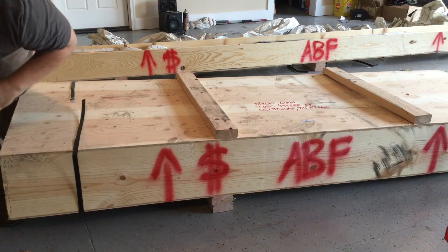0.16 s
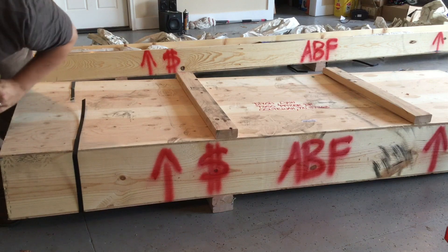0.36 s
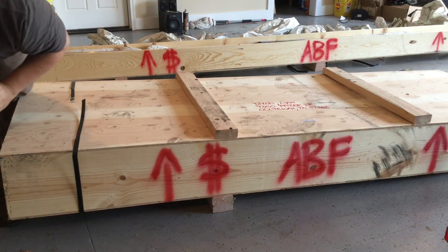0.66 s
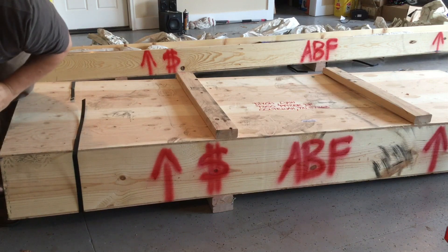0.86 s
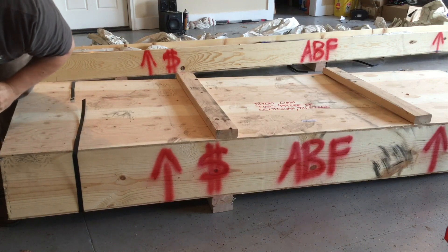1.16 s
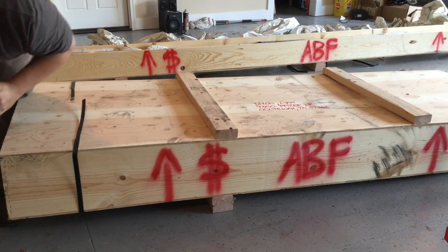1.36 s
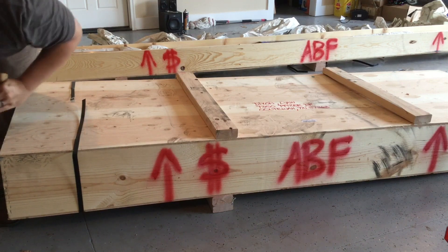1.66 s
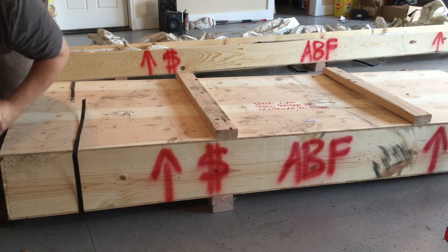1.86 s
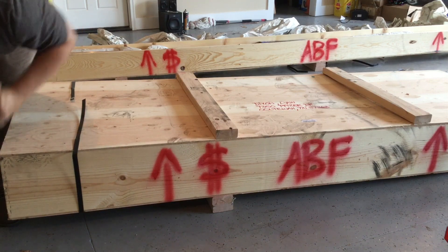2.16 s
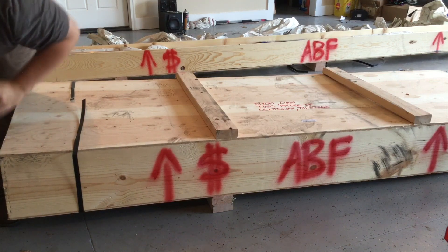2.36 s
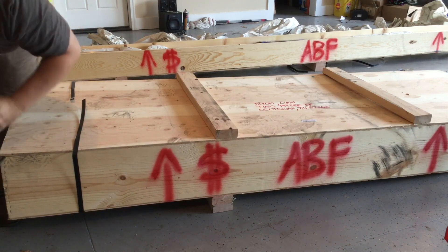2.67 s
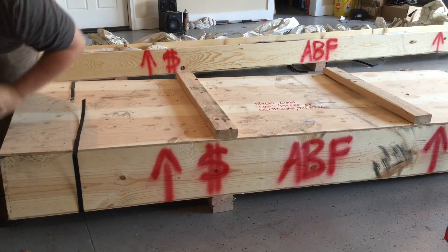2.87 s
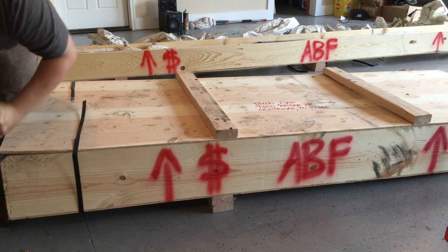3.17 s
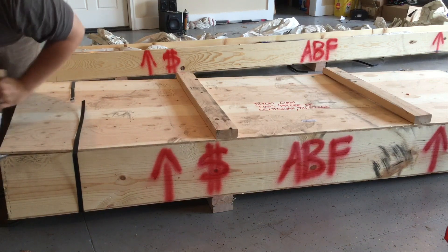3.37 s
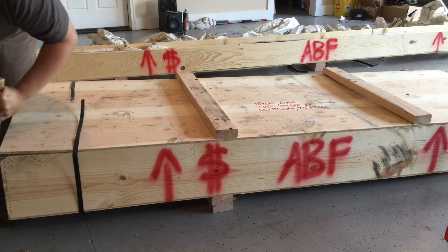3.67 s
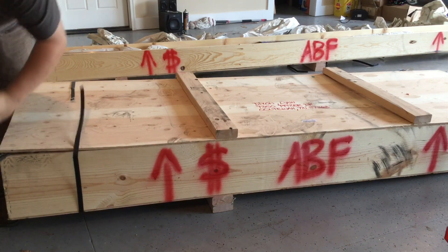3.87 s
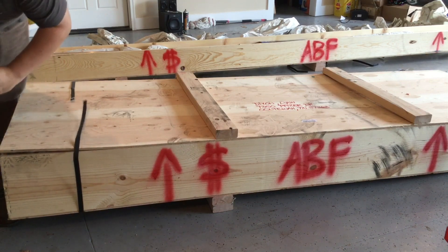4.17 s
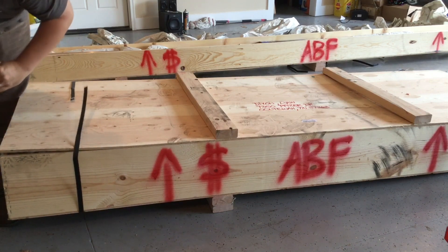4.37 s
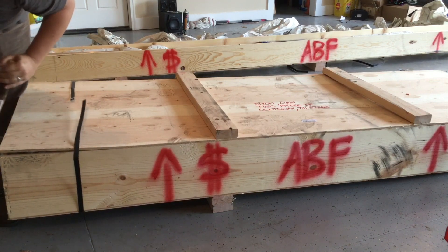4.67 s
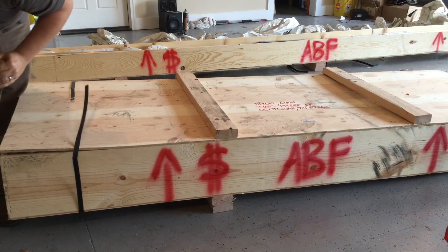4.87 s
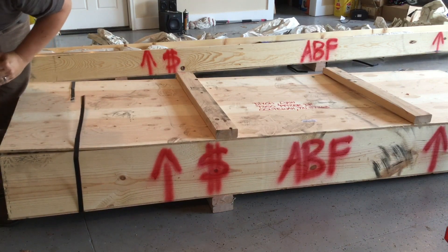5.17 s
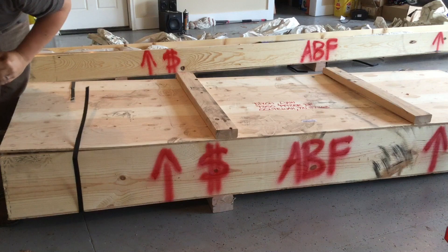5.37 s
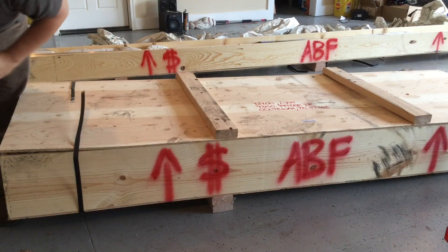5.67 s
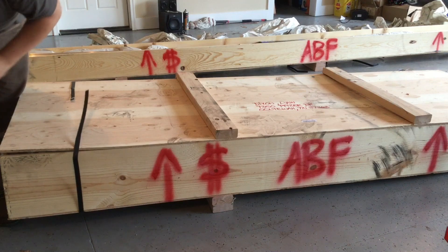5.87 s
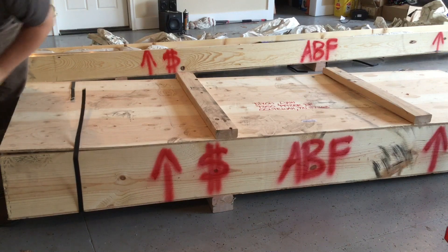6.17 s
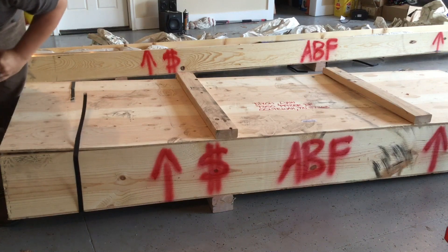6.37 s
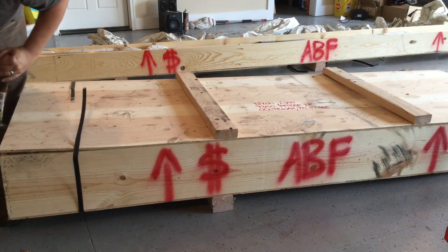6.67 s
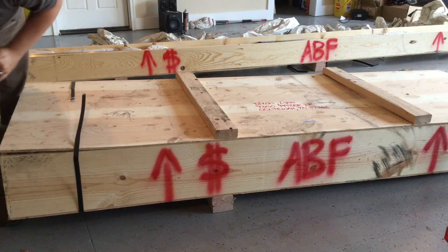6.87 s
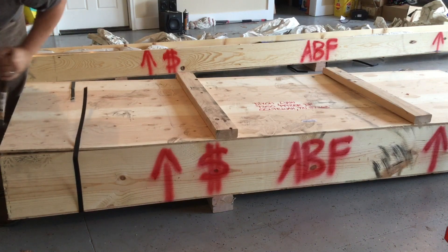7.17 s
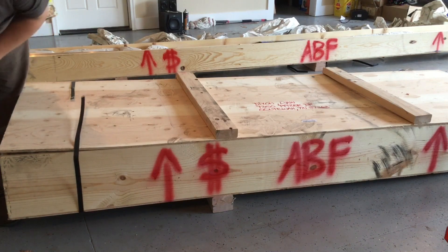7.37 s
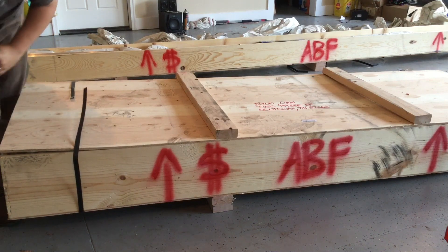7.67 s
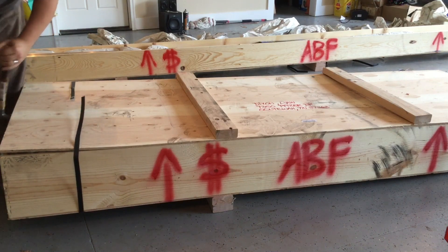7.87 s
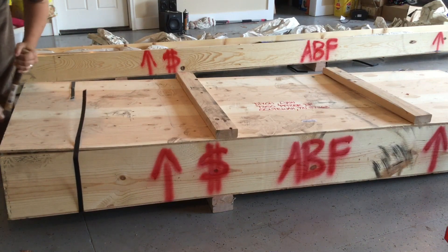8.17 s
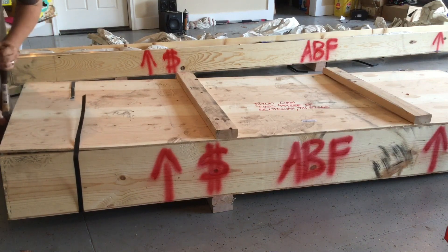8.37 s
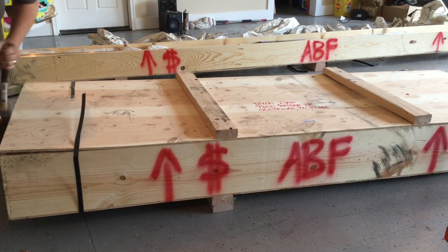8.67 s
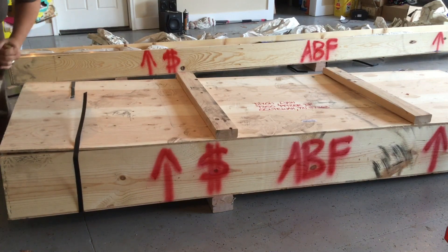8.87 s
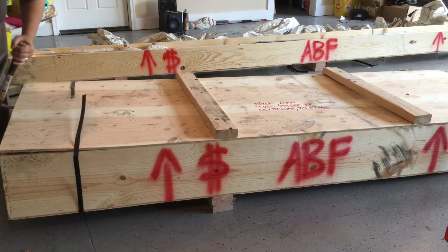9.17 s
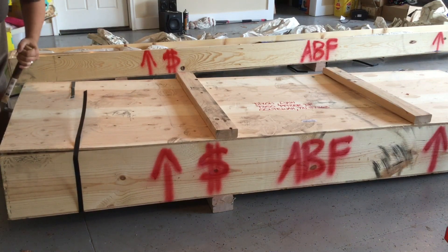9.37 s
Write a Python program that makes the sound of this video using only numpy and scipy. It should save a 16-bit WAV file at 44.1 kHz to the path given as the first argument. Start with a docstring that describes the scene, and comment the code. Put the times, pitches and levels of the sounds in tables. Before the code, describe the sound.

Close mono sound of a pry bar striking and levering a big hollow crate. Sparse light snaps and thuds give way to busy, uneven knocking with fibre cracks and brief rasping slips of steel on wood. The hard-walled garage adds a short ring. Soft distant rumble stays steady, with faint two-note bird whistles early and late.

```python
"""A concrete garage, where a steel pry bar works the lid off a long wooden crate. Filtered noise makes the far
traffic rumble, three steady tones a thin throbbing whine near 1 kHz, gliding sines the bird whistling outside.
Damped modes make the box thuds, board knocks and a hollow tap; shaped clicks make the fibre cracks and dry snaps;
uneven noise makes the short scrapes and one long faint rub. Decaying noise makes the room ring."""
import sys
import numpy as np
from scipy import signal
from scipy.fft import rfft, irfft, next_fast_len
from scipy.io import wavfile
from scipy.ndimage import map_coordinates

SR = 44100
rng = np.random.default_rng(int(sys.argv[2]) if len(sys.argv) > 2 else 0)


def generate_wav(sig):
    """Save sig (samples, or channels by samples) to the path in sys.argv[1] as 16-bit PCM at SR."""
    pcm = np.round(np.clip(np.atleast_2d(sig).T, -1, 1) * 32767).astype(np.int16)
    wavfile.write(sys.argv[1], SR, pcm)


N = 419391  # length in samples

# ring time of the room by band: f/Hz, t60/s
GARAGE_T60 = [(60, 0.26), (200, 0.61), (600, 0.68), (2000, 0.65), (6000, 0.62), (14000, 0.44)]
# colour of the still garage air: f/Hz, level/dB per Hz
AIR_COLOUR = [(15, -75), (30, -19.5), (57, -3), (129, -6.5), (260, -9.5), (492, -27.5), (1000, -31.5),
              (2500, -38), (5500, -46.5), (15300, -53)]
AIR_DB = -60
# thin steady tones that beat together: f/Hz
WHINE_HZ = (997.2, 1009.2, 1017.15)
# their loudness, in the same order: level/dB
WHINE_DB = (-98.5, -80, -83.5)
WHINE_IN_STEP_S = 0.26

# pitch glide of the bird's rising note: t/s after its start, f/Hz
RISING = [(0, 3560), (.06, 3730), (.28, 3760)]
# pitch glide of its falling note: t/s after its start, f/Hz
FALLING = [(0, 2830), (.08, 2815), (.24, 2705), (.33, 2685)]
# pitch glide of its peep: t/s after its start, f/Hz
PEEP = [(0, 4780), (.085, 4820)]
# a two-note call given twice and two short peeps: glide, start t/s, loudest t/s after the start, level/dB
BIRD_NOTES = [(RISING, .912, 0.02, -69.5), (FALLING, 1.01, 0.14, -68), (PEEP, 1.43, .04, -70),
              (PEEP, 1.88, .04, -75), (RISING, 8.96, 0.061, -69), (FALLING, 9.055, .13, -65)]
GROW_DB_PER_S, DIE_DB_PER_S, FLUTTER_DB = 72, 62, 3

# modes of a small hollow thing nudged early on: f/Hz, level/dB, t60/s
HOLLOW_MODES = [(678, -50, 0.22), (926, -57, 0.15), (1880, -68, 0.16)]
HOLLOW_S = 0.052

# the bar sliding on the boards: start t/s, strongest t/s, end t/s, rasp level/dB, fine hiss over it level/dB
# (a row that ends before it starts makes no sound)
SCRAPES = [(1.488, 1.54, 1.8, -66, -0.5), (3.332, 3.499, 3.56, -58.5, -12), (5.044, 5.055, 5.2, -52, -21.5),
           (5.7, 5.778, 5.69, -29, -20), (7, 7.01, 6.1, -48, -24), (7.142, 7.147, 10.4, -74, -25),
           (7.948, 8.105, 8.103, -45.5, -7.5), (8.372, 8.397, 8.8, -59.5, -7),
           (8.532, 8.572, 8.59, -56.5, 1), (8.727, 8.846, 8.905, -61, -9), (9.251, 9.31, 9.39, -68.5, -13)]
# colour of steel on grain: f/Hz, level/dB per Hz
RASP_COLOUR = [(350, -38), (600, -8), (688, -2.5), (1010, -13.5), (1380, -5), (4020, -12), (7500, -22.5),
               (9750, -43), (16500, -120)]
SWELL_DB, FADE_DB = 11, 21  # a stroke starts and ends this far under its strongest

# light dry snaps that hardly move the wood: t/s, level/dB, splinters over it level/dB, room share level/dB
# (function trims are added to these levels)
SNAPS = [(0.1106, -58, -8.5, -1), (1.4987, -48.5, -6, -3), (1.5324, -38.5, -7, 0.5), (1.6, -24.5, -8, -3),
         (1.9398, -49, -7.5, 12), (1.957, -47, -6, -2.5), (2.3027, -59, -7, 4), (2.6832, -51, -7.5, 1),
         (3.3707, -56.5, -17, -2), (3.4278, -45.5, -17, 3.5), (5.7, -48.5, -9.5, 18),
         (8.3634, -53.5, -6, 4)]
# colour of a dry snap: f/Hz, level/dB per Hz
SNAP_COLOUR = [(600, -15), (1350, -14), (1500, -4), (1640, 1.5), (1800, -9), (3500, -5.5), (5200, -9.5),
               (7500, -27.5), (16500, -50)]
SNAP_HZ = 1960  # clear note in the snap

# the bar strikes or levers the crate: t/s, thud level/dB, then over the thud: boom level/dB, knock level/dB,
# crack level/dB, splinters level/dB; then box note f/Hz, crack note f/Hz, room share level/dB
# (function trims are added to these levels)
BLOWS = [(0.044, -64, 4.5, -1, -13, -24, 221, 1810, 3),
         (0.965, -28.5, 1.5, -14.5, -18, -23.5, 252, 2300, 1),
         (1.261, -25.5, 2.5, -14.5, -21, -35.5, 221, 2300, 1),
         (2.365, -31, -16, -8, -11, -42, 294, 2090, 2.1), (2.715, -29, -8.5, 0, -5, -17, 244, 3440, 4.5),
         (2.984, -44.5, -2, -15, -15, -27, 256, 2340, 5.3),
         (3.166, -31, -15, -7, -16.5, -20.5, 237, 2090, 8.7),
         (3.191, -29.5, -6, -16, -15, -49, 232, 2400, 5.4), (3.495, -46, 3, -7, -7, -23, 221, 3870, 2.6),
         (3.586, -28.5, -10, -5.5, -12, -34, 279, 1730, 7.8),
         (3.82, -29.5, -13, -8.5, -16.5, -40.5, 345, 1480, 3), (3.838, -46, 3, 10, -3, 3, 221, 1970, 2.5),
         (3.868, -20.5, -3, -7, -7.5, -16.5, 257, 3580, 6.5),
         (4.293, -40.5, -5.5, -18, -24.5, -34, 224, 2260, 5.6),
         (4.466, -22.5, -12, -18.5, -21.5, -33.5, 346, 2270, 1.7),
         (4.597, -36.5, -17.5, -14, -25, -65, 339, 2020, 2.8),
         (4.761, -40.5, -17, -13, -22.5, -46, 264, 1360, 1.9),
         (4.934, -46, -0.5, -17, -32, -49, 221, 1440, 2.3),
         (5.058, -47.5, -3.5, -8, -9.5, -18, 326, 2350, 2.4),
         (5.191, -37.5, -4.5, -13.5, -35, -59, 256, 1590, 4.9),
         (5.741, -31.5, -2.5, -12, -20.5, -42, 237, 2130, 8.4),
         (5.789, -28.5, -5, -3.5, -5, -22, 304, 3700, 2.9),
         (6.02, -31.5, -6, -2.5, -8, -31.5, 304, 1370, 6.8),
         (6.148, -38.5, -20, -24, -39, -29, 346, 1440, 1.1),
         (6.395, -32.5, -9.5, -29, -43.5, -49.5, 338, 1610, 3),
         (6.564, -38, 0, -5.5, -15.5, -54.5, 339, 1440, 4), (6.695, -40, -1, -13, -24.5, -40, 333, 1450, 2),
         (6.857, -35, -7.5, 3.5, -3, -27.5, 296, 1690, 8.8),
         (6.946, -24, -8.5, -7, -11, -31.5, 255, 2260, 4.7),
         (7.127, -30.5, -12.5, -7.5, -14.5, -48.5, 223, 2270, 6.2),
         (7.275, -36, -12, -8.5, -18, -56, 353, 2480, 4.7),
         (7.323, -29, -7.5, -6, -10.5, -31.5, 345, 2320, 4.8),
         (7.446, -30.5, 1, -9, -6, -16, 325, 3630, 1.7), (7.784, -32.5, 1, -33, -51, -50, 252, 2320, 2.5),
         (7.926, -32.5, -9, -18, -21.5, -22.5, 258, 3640, 3.6),
         (7.95, -27.5, -7, -13, -21.5, -24, 256, 3670, 4.6),
         (8.234, -32, -0.5, -28, -40, -54, 240, 1440, 5.3),
         (8.288, -22.5, -7, -20.5, -40, -51, 239, 3570, 1.1),
         (8.4, -38, -0.5, -8.5, -16, -29, 256, 3590, 2.6),
         (8.472, -34.5, -6.5, -6, -22, -31, 258, 1470, 7.3),
         (8.516, -27.5, 0, -14.5, -16, -25, 260, 3860, 2.1),
         (8.723, -46, 5.5, -8, -13.5, -22.5, 248, 4100, 9),
         (9.123, -34.5, -13, -9, -26, -61, 221, 1370, 3.3),
         (9.407, -24, -5.5, -23, -31, -53, 342, 2100, 3.3)]
# modes of the crate's long walls: f/Hz, level/dB, t60/s
BOOM_MODES = [(68.8, -19, 0.36), (104.5, -7.5, 0.17), (125, -1.5, 0.13), (148.8, 0.5, 0.11),
              (180.2, -1, 0.12)]
# modes of the crate's hollow: f/Hz, level/dB, t60/s
BOX_MODES = [(205.2, 0.5, 0.18), (256, 4.5, 0.12), (291, 0.5, 0.15), (340.2, 3, 0.13), (384.2, -8, 0.19)]
# modes of the lid boards: f/Hz, level/dB, t60/s
BOARD_MODES = [(471, 8, 0.014), (566.6, -1, 0.028), (647, -4.5, 0.032), (720, 3, 0.023), (828.4, -6, 0.032),
               (952, -3.5, 0.029), (1109, -7.5, 0.039), (1235, -14, 0.1)]
KNOCK_HZ = 630  # the boards' favoured note
# colour of splitting fibre: f/Hz, level/dB per Hz
CRACK_COLOUR = [(760, -31), (1300, 0), (1740, 0), (1890, -0.5), (2690, -1.5), (2980, -2), (4390, -4.5),
                (7500, -21.5), (9750, -22), (16500, -120)]
# colour of the finest splinters: f/Hz, level/dB per Hz
SPLINTER_COLOUR = [(5000, -28), (7000, -14), (8400, -4), (10500, -1), (12500, -3), (14300, -7),
                   (15800, -18)]
LEAD_DB, LEAD_S = -6.5, 0.0032  # faint noise before each crack: end level over the listed crack, growth time
LAG_S = 0.002  # knock, crack and splinters start this much after the listed time
RISE_S_PER_DB = 0.0038 * 0.01  # a crack builds slower for each dB of its listed level away from the thud
TILT_DB, TILT_FOLLOWS = 2, 0.21  # crack tilt in dB per octave; growth per dB of splinters over crack
AFTER_PER_S, AFTER_DB, AFTER_S = 53, -21.5, 0.12  # late fibre clicks: rate, greatest start level, decay time
WASH_DB, WASH_GAP_S = 1.5, 0.004  # the walls return this much less of a crack, after this gap
PING = 0.17  # clear note against the clicks, before the crack is coloured

TOP_HZ = 15350  # upper band limit


def amp(db):
    """Turn dB into a linear gain."""
    return 10 ** (np.asarray(db) / 20)


def unit(x):
    """Bring a sound to an RMS of one."""
    return x / np.sqrt(np.mean(x ** 2) + 1e-20)


def along(points, hz):
    """Read a curve of (f/Hz, value) points on a log frequency axis."""
    f, value = np.transpose(points)
    return np.interp(np.log(hz + 1), np.log(f + 1), value)


def wobble(rate, size):
    """A smooth random curve with this many knots a second."""
    knots = rng.standard_normal(int(size * rate / SR) + 4)
    return map_coordinates(knots, [np.arange(size) * rate / SR])


def coloured(x, spectrum):
    """Filter x with a minimum-phase response, so that the colour never smears ahead of an attack."""
    m = next_fast_len(len(x) + 4096)
    gain = amp(along(spectrum, np.fft.rfftfreq(m, 1 / SR)))
    cepstrum = irfft(np.log(gain + 1e-6), m)
    # folding the cepstrum forward makes the filter causal
    cepstrum[1:m // 2] *= 2
    cepstrum[m // 2 + 1:] = 0
    return irfft(rfft(x, m) * np.exp(rfft(cepstrum)), m)[:len(x)]


def garage(wet_db, gap, direct=1):
    """A fresh room answer: the direct sound, then a noise tail whose bands die at their own speeds."""
    hz, t, bands = signal.stft(rng.standard_normal(SR), SR, nperseg=256)
    decay = amp(-60 * t / along(GARAGE_T60, hz)[:, None])
    tail = signal.istft(bands * decay, SR, nperseg=256)[1][:SR]
    tail = tail * (1 - np.exp(-(np.arange(SR) / SR / gap) ** 2))  # walls answer after a short gap
    tail = amp(wet_db) * tail / np.linalg.norm(tail)
    tail[0] = direct
    return tail


def ring(modes, t, attack, focus_hz=None):
    """Damped modes at new strengths and slightly new pitches, as if each hit lands on another spot."""
    hz, db, t60 = np.transpose(modes)[:, :, None]
    chance = rng.standard_normal((len(modes), 2))
    if focus_hz:
        db = db - 8 * np.abs(np.log2(hz / focus_hz))  # the spot favours the modes near one note
    level = amp(db + 3.0 * chance[:, :1] - 60 * t / t60)
    detuned_hz = hz * (1 + 0.023 * chance[:, 1:])
    modes_sum = np.sum(level * np.sin(2 * np.pi * detuned_hz * t), 0)
    return modes_sum * (1 - np.exp(-t / attack))


def edges(t, start, end):
    """Fade a sound in and out over 18 ms so that it has no clicks at its ends."""
    return np.clip(np.minimum(t - start, end - t) / 0.018, 0, 1)


def add_at(out, sample, sound):
    """Lay a sound into the track from this sample on."""
    out[sample:][:len(sound)] += sound


def mix(parts, levels_db):
    """Sum the parts, each set by the loudness of its first 40 ms."""
    loudness = np.sqrt(np.mean(parts[:, :SR // 25] ** 2, axis=1))
    return amp(levels_db) / loudness @ parts


def air():
    """Far rumble and hiss that swell slowly, and the beating whine of some appliance."""
    swell = amp(AIR_DB + 0.73 * wobble(7.8, size=N))
    noise = swell * unit(coloured(rng.standard_normal(N), AIR_COLOUR))
    t = np.arange(N) / SR - WHINE_IN_STEP_S
    whine = sum(amp(db) * np.sqrt(2) * np.cos(2 * np.pi * hz * t) for hz, db in zip(WHINE_HZ, WHINE_DB))
    return noise + whine


def bird():
    """Pure whistled notes from outdoors: gliding sines with a fluttering level, sent through the room."""
    out = np.zeros(N + 2 * SR)
    for glide, start, loudest, db in BIRD_NOTES:
        knots_s, knots_hz = np.transpose(glide)
        t = np.arange(0, knots_s[-1], 1 / SR)
        level_db = db - np.maximum(GROW_DB_PER_S * (loudest - t), DIE_DB_PER_S * (t - loudest))
        level = edges(t, 0, knots_s[-1]) * amp(level_db + FLUTTER_DB * wobble(41.7, size=len(t)))
        phase = 2 * np.pi * np.cumsum(np.interp(t, knots_s, knots_hz)) / SR
        note = level * np.sqrt(2) * np.sin(phase)
        add_at(out, round(start * SR), signal.fftconvolve(note, garage(wet_db=-4.0, gap=0.005)))
    return out[:N]


def hollow():
    """One faint pitched tap: a few damped modes of a small cavity, rattling in level."""
    tap = ring(HOLLOW_MODES, np.arange(SR // 3) / SR, attack=0.002)
    tap = tap * (1 + 0.38 * wobble(160, size=SR // 3))  # the rattle
    heard = signal.fftconvolve(tap, garage(wet_db=-9.5, gap=0.0081))
    return np.pad(heard, (round(HOLLOW_S * SR), N))[:N]


def scrapes():
    """Steel catches on the grain: dense uneven slips under each stroke."""
    out = np.zeros(N + 2 * SR)
    for start, top, end, rasp_db, hiss_db in SCRAPES:
        t = np.arange(start, end, 1 / SR)
        under_db = np.interp(t, [start, top, end], [SWELL_DB, 0, FADE_DB])
        stroke = edges(t, start, end) * amp(rasp_db - under_db)
        unevenness_db = 3.5 * wobble(350, size=len(t)) + 2.5 * wobble(45, size=len(t))
        slips = rng.standard_normal(len(t)) * amp(unevenness_db)
        rub = unit(coloured(slips, RASP_COLOUR)) + amp(hiss_db) * unit(coloured(slips, SPLINTER_COLOUR))
        room = garage(wet_db=-2.0, gap=0.0012)
        add_at(out, round(start * SR), signal.fftconvolve(stroke * rub, room / np.linalg.norm(room)))
    return out[:N]


def late_clicks(t):
    """Envelope of small fibres that go on parting after a crack, ever weaker."""
    chance = rng.random((2, len(t)))
    starts = (chance[0] < AFTER_PER_S / SR) * chance[1] * amp(AFTER_DB) * np.exp(-t / AFTER_S)
    return signal.lfilter([1], [1, -np.exp(-1 / (0.0014 * SR))], starts)  # decay time 1.4 ms


def crack(room_db, spectrum, tilt_db, crack_hz, rise_s):
    """A snap that builds in a moment and breaks into fibre clicks, and its splinters, with a room wash."""
    t = np.arange(SR // 3) / SR
    clicks = rng.standard_normal(SR) * amp(0.78 * wobble(500, size=SR))
    decay = amp(-60 * t / 0.014) + 0.095 * np.exp(-t / 0.034) + late_clicks(t)
    clicks[:len(t)] *= (1 - np.exp(-(t / rise_s) ** 2)) * decay
    clicks[len(t):] = 0
    clicks /= np.linalg.norm(clicks)
    wash = garage(room_db - WASH_DB, gap=WASH_GAP_S, direct=0)

    # the splitting piece has a few chance resonances and one clear note, strongest up close
    grid_hz = np.geomspace(600, 16000, num=90)
    colour_db = along(spectrum, grid_hz) + tilt_db * np.log2(grid_hz / 2800)
    colour_db = colour_db + 1.6 * rng.standard_normal(len(grid_hz))
    colour_db = colour_db + 4 * np.exp(-(np.log2(grid_hz / crack_hz) / 0.1) ** 2)
    ping = np.zeros(SR)
    ping_level = (1 - np.exp(-(t / 0.0012) ** 2)) * amp(-60 * t / 0.019)
    ping[:len(t)] = ping_level * np.sin(2 * np.pi * crack_hz * t)
    raw = clicks + PING * ping / np.linalg.norm(ping) + wash
    body = coloured(raw, np.transpose([grid_hz, colour_db]))
    splinters = coloured(1.3 * clicks + wash, SPLINTER_COLOUR)
    return np.array([body, splinters])


def snaps():
    """Thin bright fibre snaps with a ring at the low edge of their band and no box behind them."""
    out = np.zeros(N + 2 * SR)
    for s, db, splinter_db, room_db in SNAPS:
        parts = crack(room_db, SNAP_COLOUR, 0, SNAP_HZ, rise_s=0.0028)
        add_at(out, round(s * SR), amp(db - 14.5) * mix(parts, [0, splinter_db + 4.0]))
    return out[:N]


def lead_in(level_db):
    """A faint noise that swells exponentially for a few milliseconds and stops short."""
    size = SR // 40
    before_end = np.arange(size)[::-1] / SR
    noise = unit(coloured(rng.standard_normal(size), RASP_COLOUR))
    return amp(level_db) * noise * np.exp(-before_end / LEAD_S)


def blows():
    """Each contact booms and thuds the box, knocks the boards and cracks fibres."""
    out, t = np.zeros(N + 2 * SR), np.arange(SR // 3) / SR
    for s, db, boom_db, knock_db, crack_db, splinter_db, thud_hz, crack_hz, room_db in BLOWS:
        boom = ring(BOOM_MODES, t, attack=0.0094)
        thud = ring(BOX_MODES, t, attack=0.014, focus_hz=thud_hz)
        knock = ring(BOARD_MODES, t, attack=0.0023, focus_hz=KNOCK_HZ)
        box_room = garage(room_db - 7, gap=0.0091)
        board_room = garage(room_db + 1.0, gap=0.0063)
        rooms = np.array([box_room, box_room, board_room])
        wood = signal.fftconvolve(np.array([boom, thud, knock]), rooms, axes=1)[:, :SR]

        tilt_db = TILT_DB + TILT_FOLLOWS * (splinter_db - crack_db)
        fibres = crack(room_db, CRACK_COLOUR, tilt_db, crack_hz, RISE_S_PER_DB * abs(crack_db))
        heard = np.vstack([wood, fibres])
        heard[2:] = np.roll(heard[2:], round(LAG_S * SR), axis=1)  # knock, crack and splinters
        over_db = [boom_db + 7.5, 0, knock_db + 3, crack_db + 3.5, splinter_db - 2.0]
        add_at(out, round(s * SR), amp(db - 7.5) * mix(heard, over_db))

        lead = lead_in(db + crack_db + LEAD_DB)
        add_at(out, round((s + LAG_S) * SR) - len(lead), lead)  # ends where the crack starts
    return out[:N]


def scene():
    """Layer everything from the background to the pry bar, in mono."""
    return (air() + bird() + hollow() + scrapes() + snaps() + blows())[None]


def record(dry):
    """The microphone drops the deepest bass; nothing passes above the band limit."""
    low_cut = signal.butter(5, 56, "high", fs=SR, output="sos")
    dry = signal.sosfilt(low_cut, dry)
    m = next_fast_len(N + SR)
    in_band = np.fft.rfftfreq(m, 1 / SR) < TOP_HZ
    return irfft(rfft(dry, m) * in_band, m)[:, :N]


dry = scene()
out = record(dry)
generate_wav(out)
```